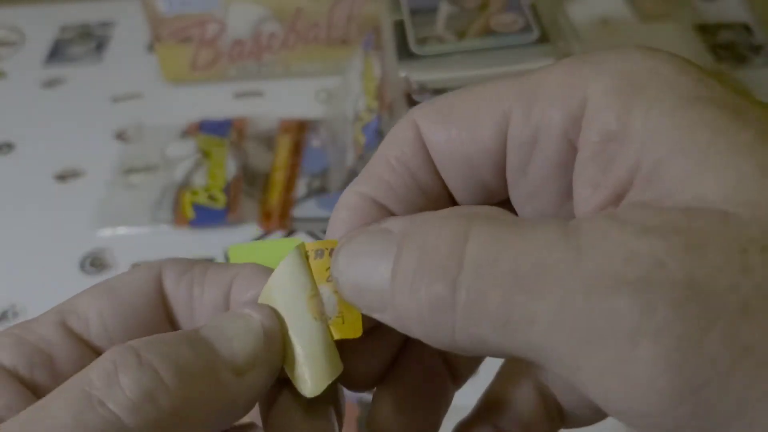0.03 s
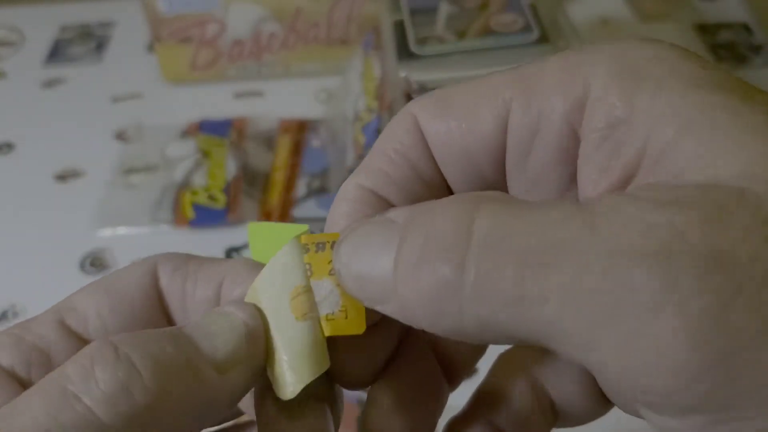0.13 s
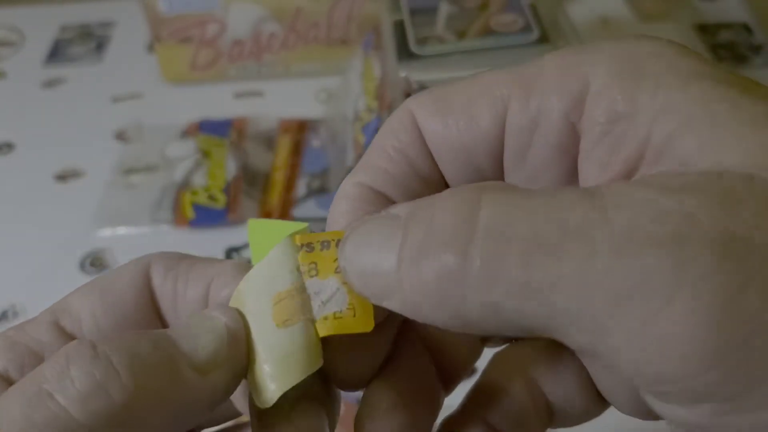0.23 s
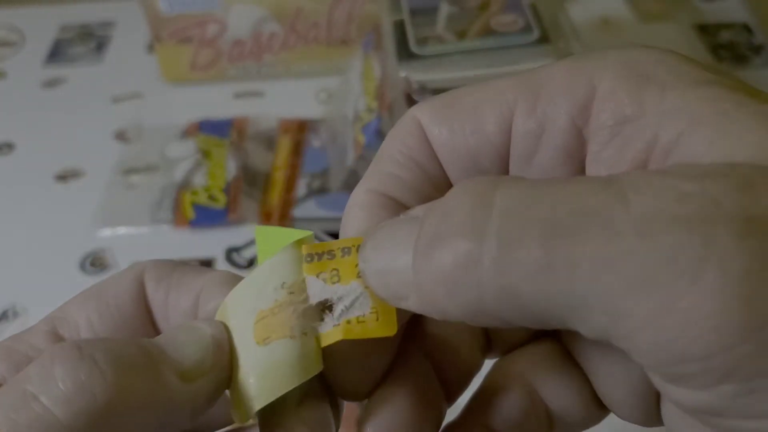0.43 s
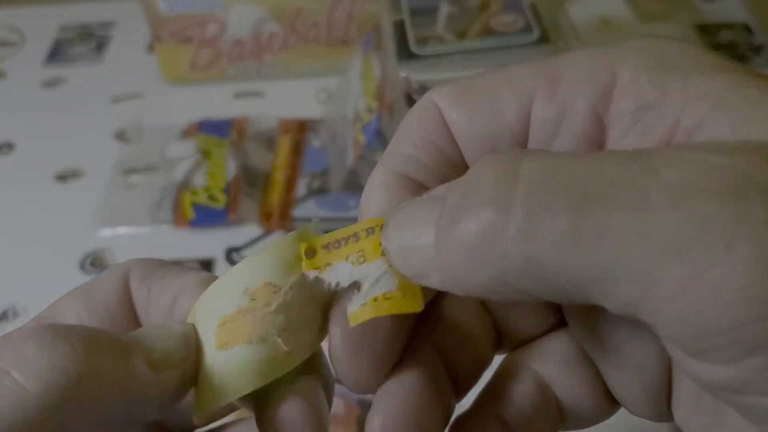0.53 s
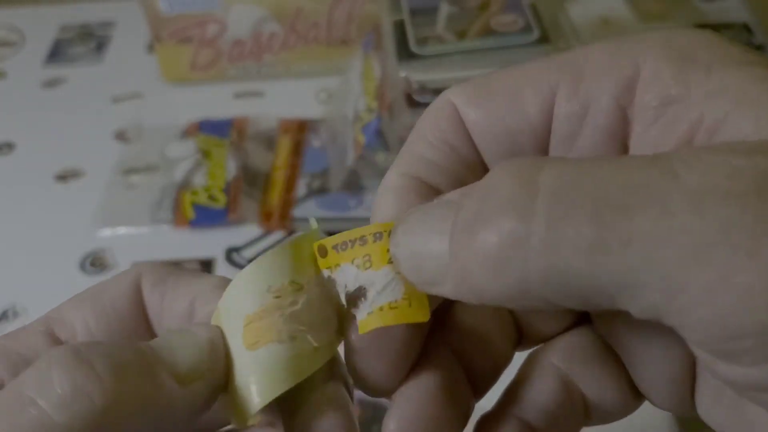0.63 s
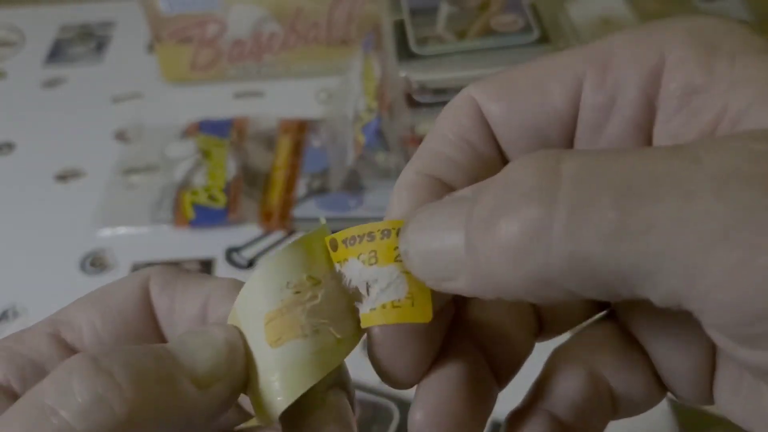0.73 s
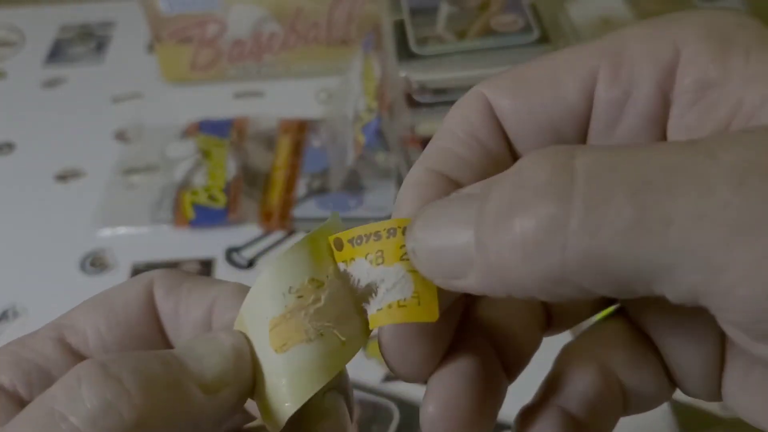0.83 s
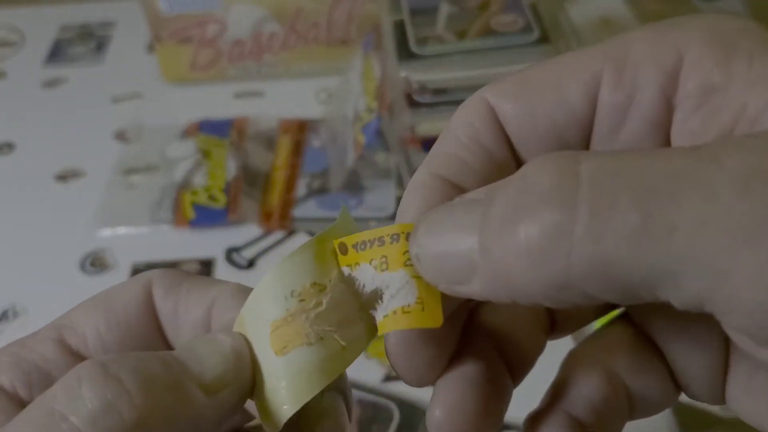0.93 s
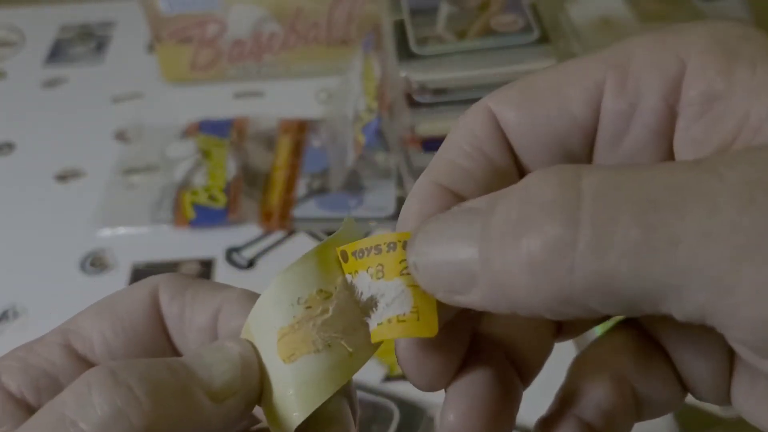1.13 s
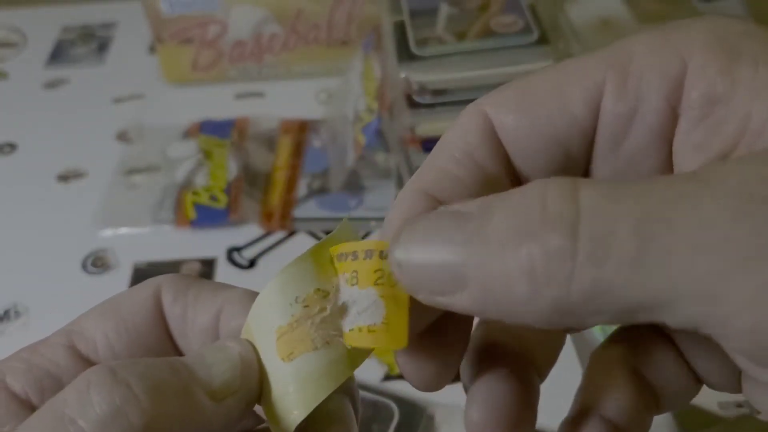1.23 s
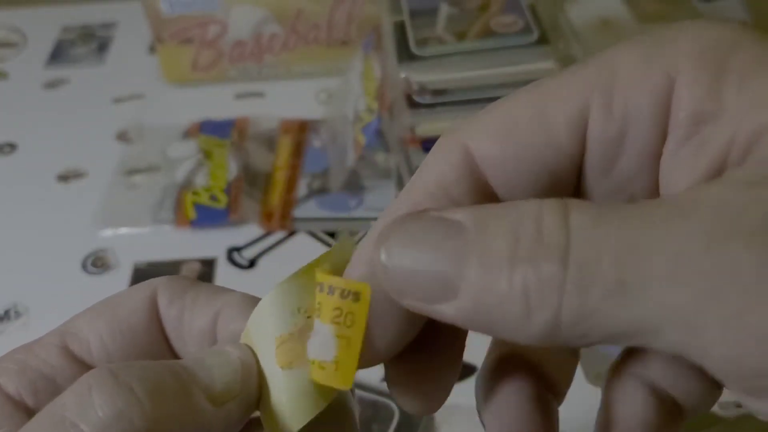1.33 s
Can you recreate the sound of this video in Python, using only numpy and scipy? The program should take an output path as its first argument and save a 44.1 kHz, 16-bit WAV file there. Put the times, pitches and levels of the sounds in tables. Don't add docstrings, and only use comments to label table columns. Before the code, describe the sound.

Sticker peeling close up: crisp bright crackling deepens into a quick papery rip, then quiet room hum

```python
import sys
import numpy as np
from scipy import signal
from scipy.io import wavfile
from scipy.ndimage import uniform_filter1d

SR = 44100
rng = np.random.default_rng(int(sys.argv[2]) if len(sys.argv) > 2 else 0)


def natural_amplitude(level_db):
    exponent = np.asarray(level_db, float) / 20
    return 10 ** exponent


def generate_wav(sig):
    pcm = np.round(np.clip(np.atleast_2d(sig).T, -1, 1) * 32767).astype(np.int16)
    wavfile.write(sys.argv[1], SR, pcm)


N = 61739

# (frequency [Hz], level [dB per Hz])
AIR_SPECTRUM = [(20, -38.5), (45, -14.5), (125, -10.5), (400, -30), (1000, -50.5), (2500, -56.5),
                (8500, -67), (15500, -47.5)]
# (frequency [Hz], likeness [0-1])
AIR_LIKENESS = [(60, 1), (130, 0.83), (290, 0.9), (640, 0), (1400, 0), (15000, 0)]
# (frequency [Hz], level [dB rms], width [Hz])
HUM_LINES = [(59, -57, 24), (117.1, -51.5, 13.3), (241.24, -69, 4.4)]
# (time [s], crackle level [dB], lowest pitch the flap radiates [Hz])
PULL = [(0, -57.5, 9700), (.07, -51, 7570), (0.129, -51.5, 5860), (.2, -56, 5930), (0.217, -51.5, 4290),
        (0.282, -54, 4300), (0.332, -46, 3980), (.42, -48, 2780), (.5, -49, 2780), (0.537, -48, 2850),
        (0.546, -40, 2250), (.566, -40, 1906), (.578, -36, 950), (.62, -35.5, 800), (0.646, -35.5, 765),
        (0.656, -55.5, 670), (0.698, -57, 695), (.73, -71, 720), (0.862, -89.5, 688)]
# (time [s], peak [dB], pitch [Hz], length [ms])
FIBRE_SNAPS = [(.0022, -29, 14500, .3), (.0057, -23, 14600, .3), (.0152, -30, 15000, .4),
               (.0246, -29, 14500, .7), (.0344, -28, 14000, .7), (.0463, -27, 14500, .4),
               (.0538, -30, 13000, .5), (.0765, -22, 15000, .6), (.0836, -30, 15000, .9),
               (.1046, -35, 12000, .6), (.134, -33, 11000, .5), (.1568, -28, 15000, .4),
               (.1913, -19, 13500, .35), (.2122, -30, 9800, .7), (.2195, -21, 12000, .35),
               (.241, -32, 12000, .4), (.3256, -31, 15000, .6), (.368, -30, 14300, .5),
               (.4134, -25, 14400, .5), (.4553, -26, 15000, .5), (.5037, -27, 14600, .5),
               (.5431, -27, 14000, 1), (.5628, -23, 12400, .3), (.5695, -22, 14500, .7),
               (.5952, -14, 15000, .4), (.6037, -10, 11500, .35), (.6058, -16, 9000, 1.3),
               (.6408, -18, 13000, 1.5), (.787, -45, 14000, .5), (1.376, -53, 15200, .4)]
# (frequency [Hz], level [dB])
PAPER_COLOUR = [(500, -40), (900, -50.5), (2000, -12), (3200, -15), (5000, -5), (8000, -10.5),
                (12000, -2.5), (15500, -2)]
# (frequency [Hz], level [dB])
RIGHT_SHADOW = [(500, -3), (2000, -6), (5000, -10), (12000, -12)]
# (frequency [Hz], width [Hz], level [dB])
CARD_MODES = [(433, 160, -2.5), (821, 200, -0.5), (1310, 620, -7), (1927, 83, -28)]
# (frequency [Hz], t60 [s])
ROOM_DECAY = [(500, 0.095), (4000, .22), (12000, 0.096)]
# (centre [s], peak [dB], flutter [Hz], length [s])
GUSTS = [(0.377, -27, 120, 0.021), (0.396, -28, 55.3, 0.037), (0.441, -15.5, 88.8, 0.021),
         (0.478, -29.5, 79, 0.068), (0.52, -18, 69.5, 0.041), (0.562, -17.5, 76.6, 0.028),
         (0.6, -23.5, 110, 0.05), (0.609, -17.5, 105, 0.0091), (0.635, -25, 90, 0.033),
         (0.677, -21.5, 65.6, 0.039), (0.703, -22, 100, 0.013), (0.738, -34, 70, 0.013),
         (.78, -27.5, 80, 0.027), (0.837, -44, 48.8, 0.047)]

AIR_DB = -54.5
FIBRES_PER_S, SPREAD_DB, CLUMP_DB, SMEAR_T60_S = 5500, 4, 2.5, 0.0019
ALIKE = 0.6
SNAP_DB, SNAP_SPIKE_DB, SNAP_RING_DB, SNAP_WIDTH_HZ = 0.5, 6.5, 8, 5000
FLAP_SLOPE_DB_PER_OCT, FLAP_FLOOR_DB = 39, -20
CARD_DB, CARD_LEAST_DB, CARD_PAN_DB = -8.5, -13, 5.5
CARD_FULL_HZ, CARD_SLOPE_DB = 927, 2.5
CARD_SNAP_DB, CARD_RUB_DB = -7.5, 1
RIGHT_LAG_S = 0.00055
HANDS_LEFT_DB, HANDS_RIGHT_DB, HANDS_T60_S = -9, -1, 0.012
ROOM_DB = -13
GUST_WOBBLE, GUST_SECOND_DB, GUST_ROAR_DB, ROAR_HZ = 0.1, -16, -14.5, 185.2
WHINE_START_S, WHINE_LENGTH_S = 1.13, 0.21
WHINE_HZ, WHINE_DB, WHINE_WAVER_HZ = 968, -82, 14
EDGE_HZ = 15800


def evened(x):
    return x / np.sqrt(np.mean(x ** 2) + 1e-20)


def wander(size):
    once = uniform_filter1d(rng.standard_normal(N), size=size)
    return evened(uniform_filter1d(once, size=size))


def read(points, hz):
    f, value = np.transpose(points)
    return np.interp(np.log(hz + 1), np.log(f + 1), value)


def colour(x, db_of):
    hz, t, z = signal.stft(x, SR, nperseg=128, noverlap=96)
    z = z * natural_amplitude(db_of(hz[:, None], t[None]))
    return signal.istft(z, SR, nperseg=128, noverlap=96)[1][..., :N]


def resonate(x, hz, width_hz):
    turn = np.exp(2j * np.pi * hz * np.arange(len(x)) / SR)
    r = np.exp(-np.pi * width_hz / SR)
    return 2 * (turn * signal.lfilter([1 - r], [1, -r], x / turn)).real


def late(x, s):
    return np.concatenate([np.zeros(round(s * SR)), x])[:N]


def air():
    frames, hz = N // 512 + 5, np.fft.rfftfreq(2048, 1 / SR)
    a, b, c, d = rng.standard_normal((frames, 1025, 4)).T
    same = np.clip(read(AIR_LIKENESS, hz), -1, 1)[:, None]
    left = a + 1j * b
    right = same * left + np.sqrt(1 - same ** 2) * (c + 1j * d)
    z = np.array([left, right]) * natural_amplitude(read(AIR_SPECTRUM, hz))[:, None]
    return natural_amplitude(AIR_DB) * evened(signal.istft(z, nperseg=2048, noverlap=1536)[1][:, :N])


def hum():
    out = np.zeros(N)
    for hz, db, width_hz in HUM_LINES:
        once = resonate(rng.standard_normal(N), hz, width_hz)
        out += natural_amplitude(db) * evened(resonate(once, hz, width_hz))
    return out


def pull_gain():
    s, db, _ = np.transpose(PULL)
    return natural_amplitude(np.interp(np.arange(N) / SR, s, db))


def crackle():
    torn = rng.random(N) < FIBRES_PER_S / SR
    size = torn * natural_amplitude(SPREAD_DB * np.minimum(rng.exponential(1, N), 5))
    tick = natural_amplitude(-60 * np.arange(200) / SR / SMEAR_T60_S)
    envelope = np.sqrt(np.abs(signal.oaconvolve(size ** 2, tick)[:N]))
    left, own = rng.standard_normal((2, N))
    noise = np.array([left, ALIKE * left + np.sqrt(1 - ALIKE ** 2) * own])
    return evened(envelope * noise * natural_amplitude(CLUMP_DB * wander(120))) * pull_gain()


def snaps():
    out, t = np.zeros(N + 900), np.arange(900) / SR
    for s, db, hz, ms in FIBRE_SNAPS:
        noise, spike = rng.standard_normal((2, 900))
        u = 1000 * t / np.clip(ms, 0.2, 3)
        burst = noise * natural_amplitude(SNAP_SPIKE_DB * spike) * np.sqrt(u) * np.exp(-u)
        burst = burst + natural_amplitude(SNAP_RING_DB) * 2 * resonate(burst, hz, SNAP_WIDTH_HZ)
        out[round(s * SR):][:900] += natural_amplitude(db + SNAP_DB) * burst / np.abs(burst).max()
    return out[:N]


def sticker(tearing):
    s, _, flap_hz = np.transpose(PULL)

    def paper_db(hz, t):
        octaves = np.log2((hz + 1) / np.interp(t, s, flap_hz))
        return read(PAPER_COLOUR, hz) + np.clip(FLAP_SLOPE_DB_PER_OCT * octaves, FLAP_FLOOR_DB, 0)
    return colour(tearing, paper_db)


def card(tearing):
    s, _, flap_hz = np.transpose(PULL)
    pitch_hz = np.interp(np.arange(N) / SR, s, flap_hz)
    octaves = np.maximum(np.log2(pitch_hz / CARD_FULL_HZ), 0)
    drive = tearing * natural_amplitude(CARD_DB + np.maximum(-CARD_SLOPE_DB * octaves ** 2, CARD_LEAST_DB))
    return sum(natural_amplitude(db) * resonate(drive, hz, width_hz) for hz, width_hz, db in CARD_MODES)


def scattered(x, db):
    decay = natural_amplitude(-60 * np.arange(600) / SR / HANDS_T60_S)
    echoes = rng.standard_normal(600) * (rng.random(600) < 0.3) * decay
    echoes[:12] = 0
    return x + natural_amplitude(db) * signal.oaconvolve(x, echoes / np.linalg.norm(echoes))[:N]


def room(x):
    n = SR // 2
    taps = rng.standard_normal((2, n)) * (rng.random((2, n)) < 0.1) * (np.arange(n) > 100)
    tail = colour(taps, lambda hz, t: -60 * t / read(ROOM_DECAY, hz))
    return signal.fftconvolve(x[None], tail / np.linalg.norm(tail[0]), axes=1)[:, :N]


def draught():
    t, out, swell = np.arange(N) / SR, np.zeros(N), np.zeros(N)
    wobble_s = GUST_WOBBLE * np.cumsum(wander(300)) / SR
    for s, db, hz, length_s in GUSTS:
        shape = natural_amplitude(db) * np.exp(-(2 * (t - s) / length_s) ** 2)
        angle = 2 * np.pi * (rng.random() + hz * (t - s + wobble_s))
        out += shape * (np.cos(angle) + natural_amplitude(GUST_SECOND_DB) * np.cos(2 * angle))
        swell += shape
    low_pass = signal.butter(4, ROAR_HZ, fs=SR, output="sos")
    roar = evened(signal.sosfilt(low_pass, rng.standard_normal(N)))
    return out + natural_amplitude(GUST_ROAR_DB) * swell * roar


def whine():
    u = np.clip((np.arange(N) / SR - WHINE_START_S) / WHINE_LENGTH_S, 0, 1)
    hz = WHINE_HZ + WHINE_WAVER_HZ * wander(600)
    tone = np.sin(2 * np.pi * np.cumsum(hz) / SR)
    return natural_amplitude(WHINE_DB) * np.sqrt(np.abs(np.sin(np.pi * u))) * tone


def scene():
    fibres, big = crackle(), snaps()
    left, right = sticker(fibres + big)
    rub = natural_amplitude(CARD_RUB_DB) * pull_gain() * rng.standard_normal(N)
    body = card(fibres[0] + natural_amplitude(CARD_SNAP_DB) * big + rub)
    right = colour(late(right, RIGHT_LAG_S), lambda hz, t: read(RIGHT_SHADOW, hz) + 0 * t)
    near_left = scattered(left + body, HANDS_LEFT_DB)
    near_right = scattered(right + natural_amplitude(-CARD_PAN_DB) * body, HANDS_RIGHT_DB)
    wet = natural_amplitude(ROOM_DB) * room(left + body) * natural_amplitude([[0], [-3]])
    peel = natural_amplitude(7.5) * (np.array([near_left, near_right]) + wet)
    return air() + hum() + peel + draught() * [[1], [0]] + whine()


def roll_off(x):
    return signal.sosfilt(signal.butter(12, 16980, fs=SR, output="sos"), x)


def record(dry):
    low_pass = signal.firwin(511, EDGE_HZ, window=("kaiser", 5), fs=SR)
    mix = signal.oaconvolve(dry, low_pass[None], "same")
    return roll_off(mix)


dry = scene()
out = record(dry)
generate_wav(out)
```